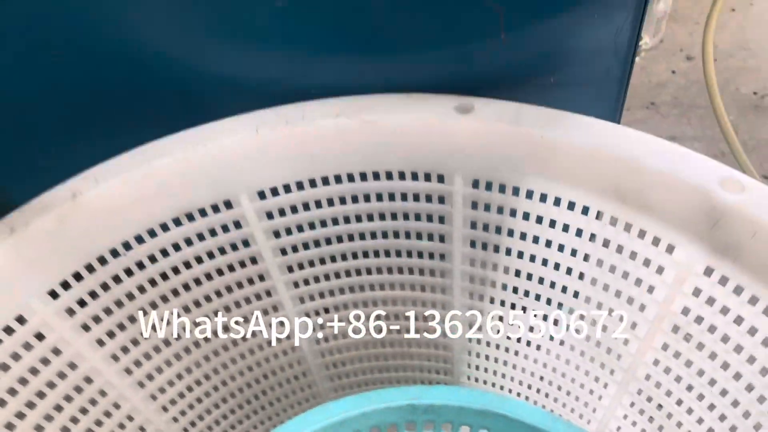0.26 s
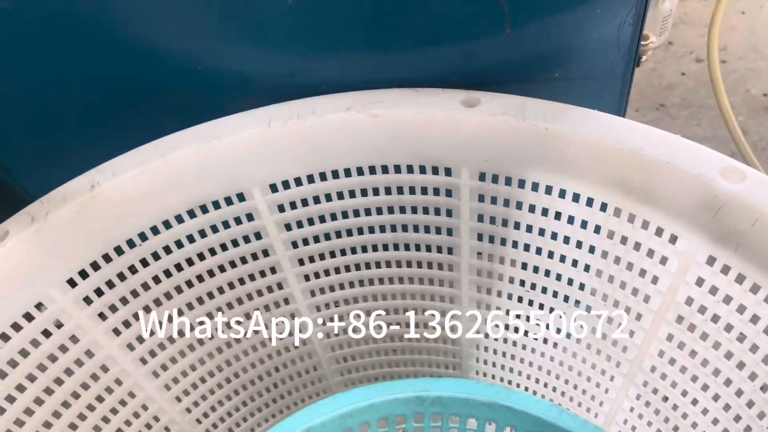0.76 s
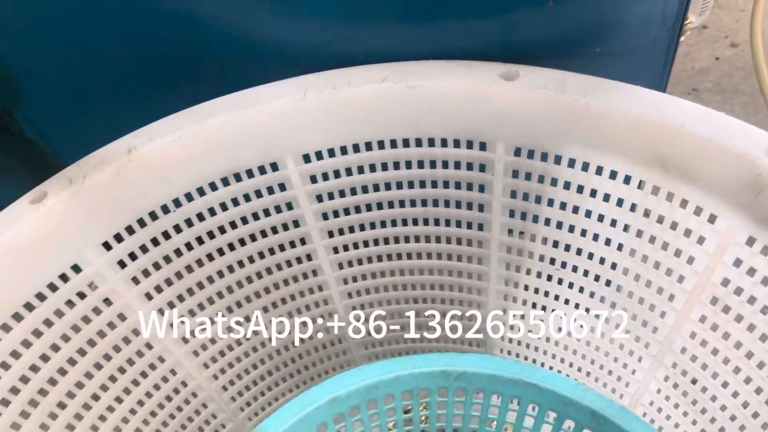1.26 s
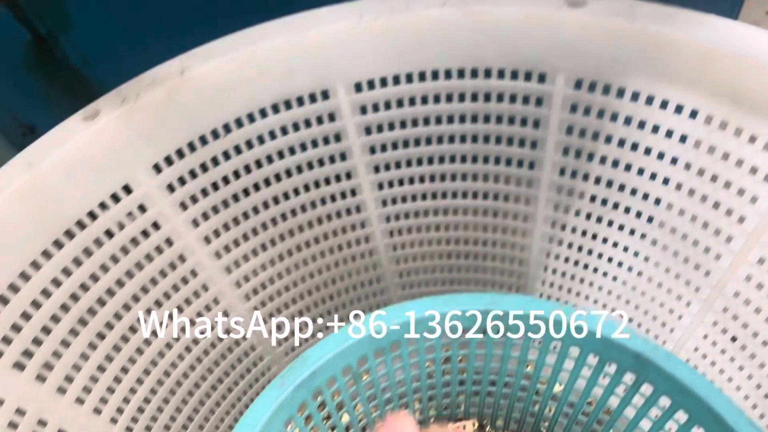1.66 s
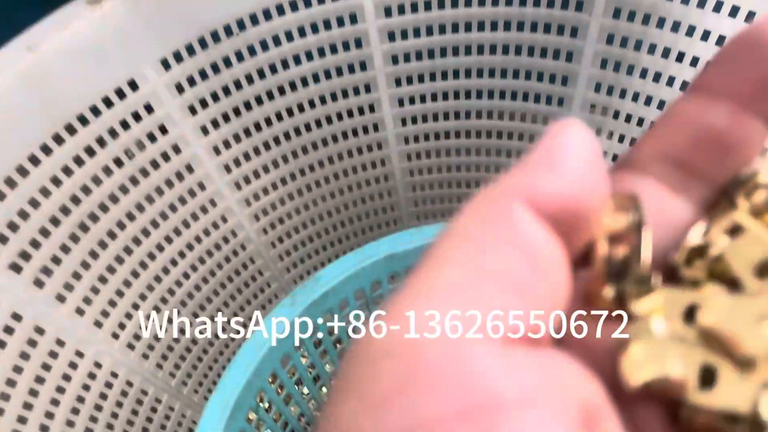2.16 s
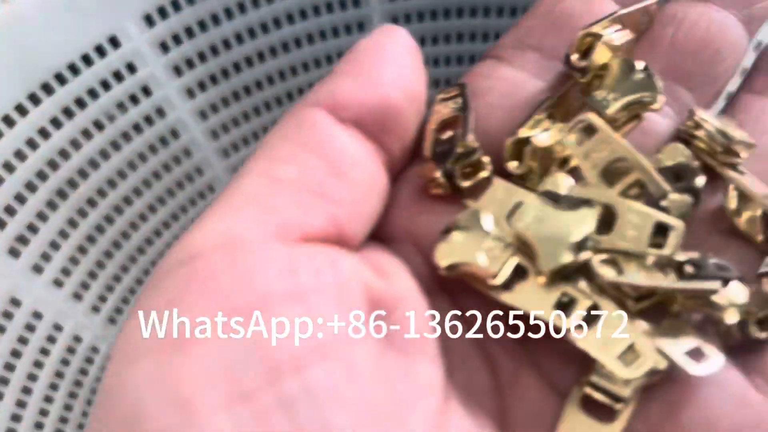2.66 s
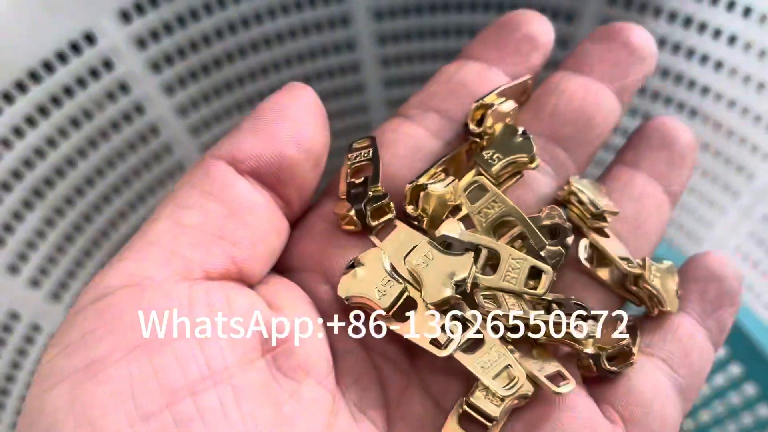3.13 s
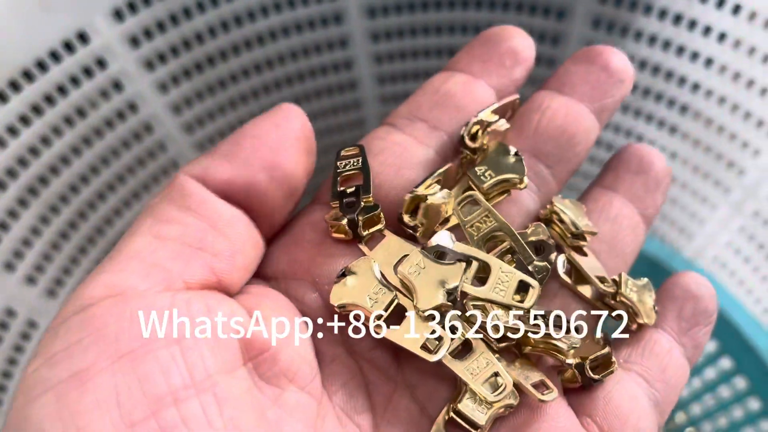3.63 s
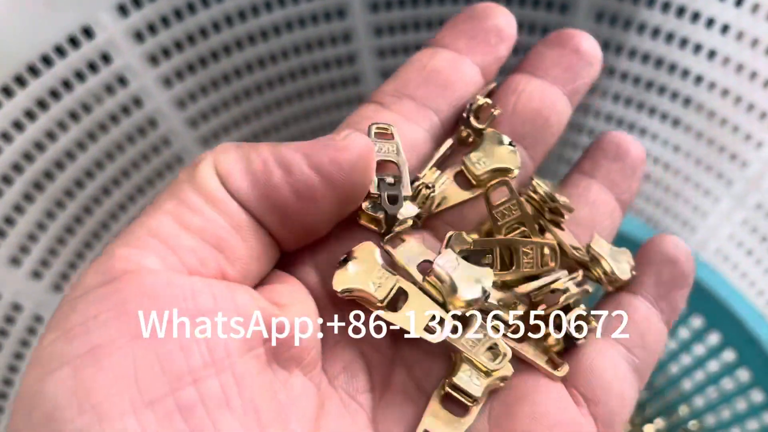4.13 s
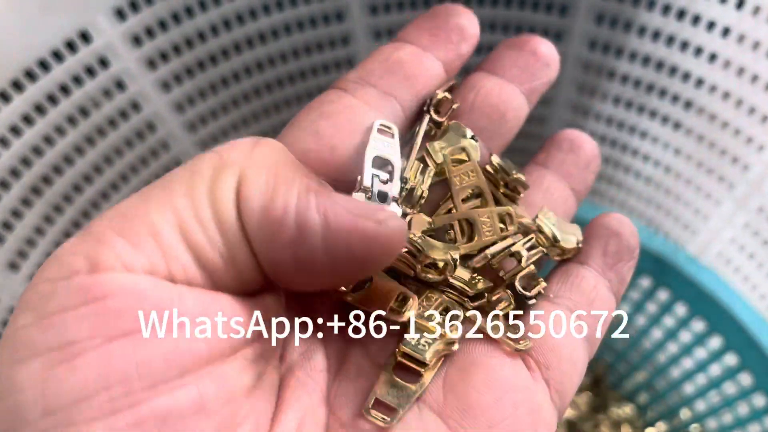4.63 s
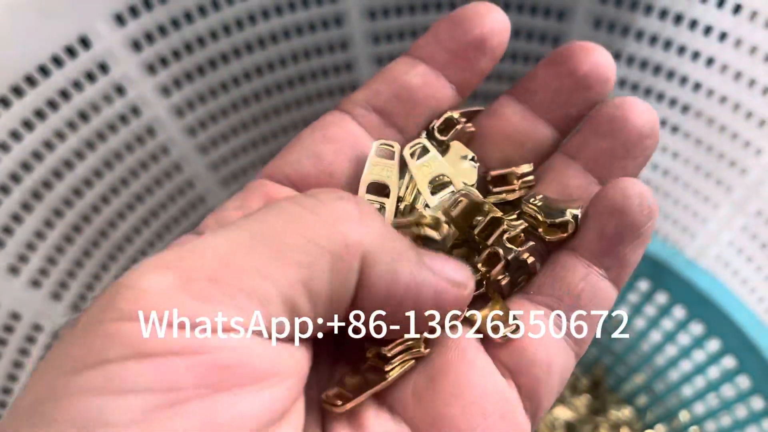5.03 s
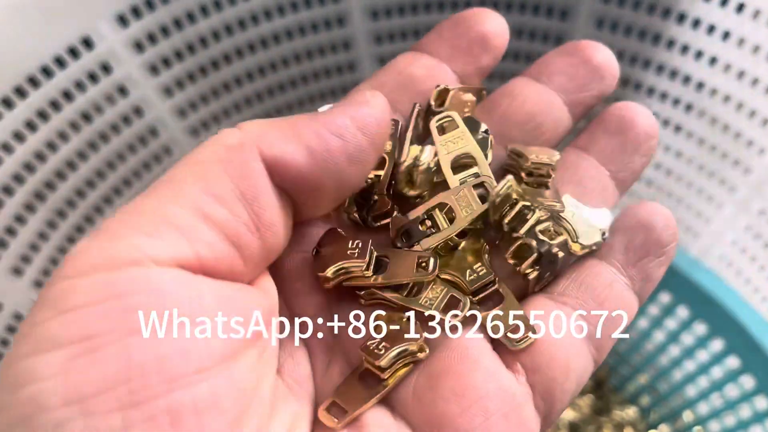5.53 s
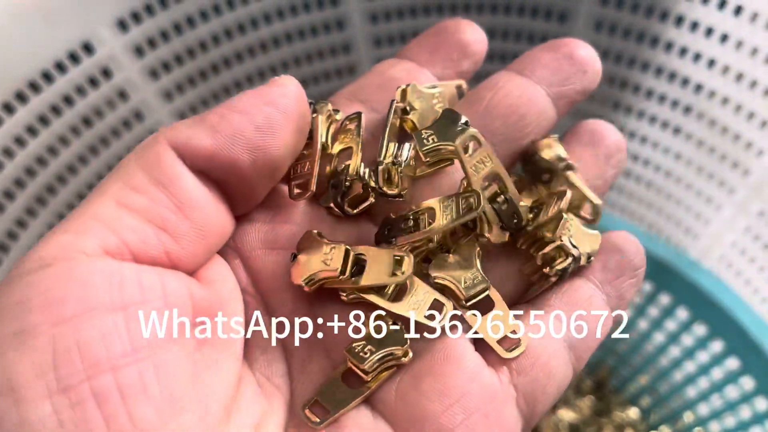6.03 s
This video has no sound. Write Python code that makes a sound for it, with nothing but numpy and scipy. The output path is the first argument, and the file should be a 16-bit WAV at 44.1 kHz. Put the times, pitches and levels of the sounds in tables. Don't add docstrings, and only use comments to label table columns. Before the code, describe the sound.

Close, slightly compressed stereo pickup beside a working machine. Paired dull thuds repeat nearly twice a second, with dry clacking between them and a hard metallic tick late in most turns. Light metal pieces land irregularly, ringing high and short. Later, pieces rub and jingle nearby, busiest near the end. Continuous tiny clicking from a vibrating bowl, low hum and a dull hall wash fill the background.

```python
import sys
import numpy as np
from scipy import signal
from scipy.fft import rfft, irfft, next_fast_len
from scipy.io import wavfile

SR = 44100
rng = np.random.default_rng(int(sys.argv[2]) if len(sys.argv) > 2 else 0)


def volts_from_db(level):
    exponent = np.asarray(level, float) / 20
    return 10 ** exponent


def int16_out(signal):
    q = np.round(np.clip(np.atleast_2d(signal).T, -1, 1) * 32767)
    wavfile.write(sys.argv[1], SR, q.astype(np.int16))


N = 277389


def rms_one(x):
    return x / np.sqrt(np.mean(x ** 2) + 1e-20)


def at_hz(points, hz):
    table_hz, value = np.transpose(points)
    return np.interp(np.log(hz), np.log(table_hz), value)


def drift(rate):
    r = np.exp(-80 * np.pi * rate / SR)
    slow = signal.lfilter([1], [1, -2 * r, r * r], rng.standard_normal(N // 40 + 2002))[2000:]
    return np.interp(np.arange(N) / 40, np.arange(len(slow)), rms_one(slow))


def ring(clicks, hz, t60):
    r, w = volts_from_db(-60 / (t60 * SR)), 2 * np.pi * hz / SR
    return signal.lfilter([0, np.sin(w)], [1, -2 * r * np.cos(w), r * r], clicks + 1e-18)


def blows(times, level_db, chatter, count=1):
    when, size = rng.random((2, len(times), count))
    when[:, 0], size[:, 0] = 0, 1
    chatter_s = np.c_[chatter * np.ones(len(times))]
    at = np.round((np.c_[times] + when * chatter_s) * SR).astype(int)
    size = size * np.c_[volts_from_db(np.asarray(level_db))] * (at < N)
    return np.bincount(np.minimum(at, N - 1).ravel(), size.ravel(), N)


def struck(modes, times, level_db, chatter):
    out = np.zeros(N)
    for hz, db, t60 in modes:
        mode_db = level_db + db + rng.normal(0, 1.7, len(times))
        out += ring(blows(times, mode_db, chatter, count=5), hz, t60)
    return out


def crack(times, level_db, chatter, t60, low_hz, high_hz):
    fade = signal.lfilter([1], [1, -volts_from_db(-60 / (t60 * SR))], blows(times, level_db, chatter, count=3))
    noise = rng.standard_normal(N) * np.sqrt(SR / 8 / (high_hz - low_hz))
    band = signal.butter(2, [low_hz, high_hz], "band", fs=SR, output="sos")
    return signal.sosfilt(band, fade * noise)


FIRST_RAM_S, TURN_S, RETURN_AFTER_S = 0.1338, 0.5402, 0.1532


def rams():
    return np.arange(FIRST_RAM_S, N / SR, TURN_S)


# delay/s, f/Hz, level/dB, t60/s, polarity
RAM_PUSHES = [
    (-.0065, 170, -24, .03, -1),
    (-.004, 560, -22, .02, 1),
    (0, 300, -11.5, .03, -1),
    (.0074, 105, -8.5, .08, 1),
    (.0074, 350, -19, .05, 1),
    (.038, 130, -21, .05, 1),
]
# delay/s, f/Hz, level/dB, t60/s, polarity
RETURN_PUSHES = [
    (-.002, 600, -16, .025, 1),
    (.001, 400, -21, .03, -1),
    (.0062, 130, -12.5, .09, 1),
]
RAM_DB, RETURN_DB, UNEVEN_DB = -1.9, -0.3, 0.84


def thuds():
    ram_s, out = rams(), np.zeros(N)
    strokes = [(ram_s, RAM_DB, RAM_PUSHES), (ram_s + RETURN_AFTER_S, RETURN_DB, RETURN_PUSHES)]
    for stroke_s, strength_db, pushes in strokes:
        stroke_db = strength_db + UNEVEN_DB * rng.standard_normal(len(ram_s))
        for lag, hz, db, t60, sign in pushes:
            out += sign * ring(blows(stroke_s + lag, stroke_db + db, 0), hz, t60)
    return out


# delay after ram/s, f/Hz, width/Hz, level/dB, rise/s
LATCH_CLACKS = [(-.016, 4500, 6000, -33, .012), (-.005, 1200, 1500, -35.5, 0.015),
                (0.046, 2750, 300, -33.5, 0.0072), (.046, 6600, 500, -30, 0.0023),
                (.048, 700, 151, -34.5, .005), (.05, 2970, 5030, -35.5, 0.011),
                (.058, 1880, 356, -33.5, 0.0048), (.06, 2450, 504, -32, 0.0065),
                (.06, 920, 201, -34.5, 0.0082), (0.209, 2610, 304, -31.5, 0.0036),
                (.213, 4060, 5000, -36, 0.0092), (.243, 1950, 610, -32, 0.0057),
                (.243, 1010, 200, -34.5, 0.0047), (.243, 4420, 5000, -33, 0.0043),
                (.258, 464, 150, -32, 0.0061), (.263, 995, 119, -34, 0.0069),
                (0.261, 2970, 2500, -33.5, .008), (.27, 1500, 393, -37.5, 0.0069)]


def clacks():
    t, out = np.arange(SR // 10) / SR, np.zeros(N + SR)
    start = np.c_[rams()]
    for lag, hz, width, db, rise in LATCH_CLACKS:
        swell = t / rise * np.exp(1 - t / rise) * rng.standard_normal((len(start), len(t)))
        r = np.exp(-np.pi * width / SR)
        gain, turn = np.sqrt(1 - r * r), np.cos(2 * np.pi * hz / SR)
        burst = signal.lfilter([gain, 0, -gain], [1, -2 * r * turn, r * r], swell)
        burst = burst * volts_from_db(db + rng.normal(0, 1.2, start.shape))
        at = np.round((start + lag + t) * SR).astype(int)
        out += np.bincount(at.ravel(), burst.ravel(), N + SR)
    return out[:N]


# t/s, peak level/dB, bright level/dB
EJECTOR_TICKS = [
    (0.467, -17.5, -29),
    (1.0034, -19, -37),
    (1.5444, -30, -46),
    (2.086, -21.5, -35),
    (2.6307, -28, -34),
    (3.1668, -15.5, -34),
    (3.7197, -17.5, -31),
    (4.2494, -27, -40),
    (4.7963, -19, -40),
    (5.3294, -27, -49),
]
# f/Hz, level/dB, t60/s
EJECTOR_MODES = [(4050, -4, .025), (4400, -6, .02), (4790, -2, .028), (6250, -6, .02)]


def ejector():
    s, db, bright_db = np.transpose(EJECTOR_TICKS)
    tick = struck(EJECTOR_MODES, s, db - 6.5, 0.002007)
    snap = crack(s, db - 10.5, 0.0029, t60=0.047, low_hz=3800, high_hz=5250)
    return tick + snap + crack(s, bright_db + 5.5, 0.0066, t60=0.061, low_hz=8720, high_hz=13690)


# f/Hz, level/dB, t60/s
BODY_MODES = [(2790, -3, .07), (2832, -2, .11), (2930, -4, .05), (3010, -3, .06), (3074, -4, .09),
              (3143, -3, .11), (3260, -6, .05)]
EDGE_MODES = [(6910, -13, 0.12), (6960, 2, 0.15), (7390, -20, 0.051)]
JINGLE_MODES = [(7700, -1, .05), (8100, 0, .06), (8600, 0, .07), (9120, -3, .06), (9450, -4, .04)]
BRIGHT_MODES = [(9810, 6.5, .06), (10270, 1.5, .04), (11300, 1.5, .06), (12000, 3, 0.054),
                (12100, -17, 0.026)]
BRIGHT_DB = -9


def parts(s, body_db, scrape_db, edge_db, jingle_db):
    bright_db = jingle_db + BRIGHT_DB
    out = struck(BODY_MODES, s, body_db - 5.0, 0.0046)
    out += struck(EDGE_MODES, s, edge_db - 4.5, .005)
    out += struck(JINGLE_MODES, s, jingle_db - 8, .006)
    out += struck(BRIGHT_MODES, s, bright_db - 8.0, 0.0063)
    out += crack(s, scrape_db - 2.5, .005, t60=0.068, low_hz=3270, high_hz=6700)
    out += crack(s, jingle_db - 2, .006, t60=.075, low_hz=7200, high_hz=9700)
    return out + crack(s, bright_db + 0.5, 0.0058, t60=0.039, low_hz=9900, high_hz=14100)


# t/s, body level/dB, treble level/dB
CHUTE_DROPS = [(0.0252, -26, -13.5), (0.0725, -34, -31), (0.11, -40, -28), (0.582, -28, -23),
               (0.6127, -27.5, -27), (0.628, -26, -21), (0.672, -33, -30), (1.111, -20, -17),
               (1.165, -29, -34), (1.6161, -23, -6), (1.681, -22, -27), (1.761, -29, -21.5),
               (1.7744, -31, -27), (1.799, -46, -25), (2.2624, -18.5, -19.5), (2.421, -31, -29),
               (2.865, -20, -17), (2.891, -41, -24), (3.258, -24.5, -20.5), (3.29, -24, -33),
               (3.325, -26.5, -31), (4.357, -25.5, -19.5), (5.422, -38, -18.5), (5.454, -24.5, -21.5),
               (5.4935, -27, -18.5), (5.527, -30, -29), (5.6495, -24, -24), (6.073, -23, -15.5),
               (6.0813, -21, -21)]
EDGE_DB, SCRAPE_DB = -9, -10


def drops():
    s, body_db, treble_db = np.transpose(CHUTE_DROPS)
    scrape_db = (body_db + treble_db) / 2 + SCRAPE_DB
    return parts(s, body_db, scrape_db, treble_db + EDGE_DB, treble_db)


# t/s, level/dB, favoured f/Hz, loss/dB per octave away
PLATE_TOUCHES = [
    (0.0245, -28, 5930, 45),
    (0.6125, -34, 5800, 18),
    (1.1102, -28.5, 4540, 22),
    (1.6157, -27, 5500, 9),
    (1.76, -39, 5120, 70),
    (2.8649, -36, 5500, 25),
    (4.356, -40, 4660, 12),
    (5.4929, -38, 5900, 35),
    (6.0805, -29.5, 5400, 45),
]
# f/Hz, level/dB, t60/s
PLATE_MODES = [(3585, 0, .2), (4276, -1, .18), (5120, 1, .5), (5496, 0, .3), (6896, 0, .13)]


def plate():
    s, db, near_hz, loss_db = np.transpose(PLATE_TOUCHES)
    out = np.zeros(N)
    for hz, mode_db, t60 in PLATE_MODES:
        touch_db = db + mode_db + 4.5 - loss_db * np.abs(np.log2(hz / near_hz))
        out += ring(blows(s + .003, touch_db, 0), hz, t60)
    return out


# t/s, scrape level/dB, treble level/dB
PART_JOSTLES = [
    (2.2987, -35, -36),
    (2.706, -22, -36),
    (3.799, -28, -24),
    (4.32, -26, -26),
    (4.982, -39, -26),
    (5.102, -46, -31),
    (5.8427, -26, -29),
    (5.872, -25, -22.5),
    (5.923, -28, -31),
    (6.1245, -28, -26),
]
JOSTLE_BODY_DB, JOSTLE_EDGE_DB = -12, -20


def jostles():
    s, scrape_db, treble_db = np.transpose(PART_JOSTLES)
    return parts(s, scrape_db + JOSTLE_BODY_DB, scrape_db, treble_db + JOSTLE_EDGE_DB, treble_db)


RATTLE_PER_S, RATTLE_DB = 1500, -40


def bowl_rattle():
    sizes = volts_from_db(5.36 * np.minimum(rng.exponential(1, N), 5)) * rng.choice([-1, 1], N)
    born = rng.random(N) < RATTLE_PER_S * volts_from_db(3.0 * drift(8)) / SR
    pitches, dealt = np.geomspace(1500, 12000, 10), rng.integers(0, 10, N)
    hops = sum(ring(sizes * born * (dealt == k), hz, 11.8 / hz) for k, hz in enumerate(pitches))
    return volts_from_db(RATTLE_DB) * rms_one(hops)


# f/Hz, width/Hz, level/dB
MOTOR_TONES = [(94.6, 21, -40), (299.7, 5.8, -43), (365, 12, -44), (444.9, 8.6, -42), (973, 14.4, -48.5)]


def motors():
    white, out = rng.standard_normal(N), np.zeros(N)
    for hz, width, db in MOTOR_TONES:
        t60 = 1.64 / width
        out += volts_from_db(db) * rms_one(ring(ring(white, hz, t60), hz, t60))
    return out


ECHO_DB, ECHO_T60_S = -7.5, 0.34


def echoes(x):
    t = np.arange(SR // 2) / SR
    wash = rng.standard_normal((2, len(t))) * volts_from_db(-60 * t / ECHO_T60_S) * np.minimum(t / 0.0036, 1)
    wash = signal.sosfilt(signal.butter(4, 5500, fs=SR, output="sos"), wash)
    wash = wash / np.sqrt(np.sum(wash[0] ** 2))
    return volts_from_db(ECHO_DB) * signal.fftconvolve(x[None], wash, axes=1)[:, :N]


# t/s, level/dB
FLOOR_LEVEL = [(0.0, -28.5), (1.5, -28), (1.75, -29), (4.802, -28.5), (5.12, -27), (5.45, -28.5),
               (6.29, -27.5)]
# f/Hz, density/dB per Hz
HALL_COLOUR = [(28, -27), (45, -4.5), (105, 0.5), (225, -8.5), (430, -9), (700, -13.5), (1500, -15.5),
               (2800, -16), (4500, -19.5), (6500, -15), (8500, -21.5), (10500, -20), (13000, -24.5),
               (15500, -27.5)]
# f/Hz, likeness/0-1
PORT_LIKENESS = [(60, 1), (300, 0.8), (700, 0.38), (1800, 0.04), (3500, 0.47), (5500, 0.45), (7000, 0.15)]


def factory_floor(patchy_db):
    out, together, edges = 0, drift(5.0), 33 * 2 ** np.arange(0, 9.1, .5)
    white = rng.standard_normal((2, 2, N))
    for k, (low, high) in enumerate(zip(edges, edges[1:])):
        band = signal.butter(2, [low, high], "band", fs=SR, output="sos")
        mid, side = signal.sosfilt(band, white[k % 2])
        hz = np.sqrt(low * high)
        alike = np.clip(at_hz(PORT_LIKENESS, hz), -1, 1)
        gain = volts_from_db(at_hz(HALL_COLOUR, hz) + patchy_db * (0.35 * together + drift(12.6)))
        out = out + gain * (np.sqrt(1 + alike) * mid + np.sqrt(1 - alike) * side * [[1], [-1]])
    s, db = np.transpose(FLOOR_LEVEL)
    return volts_from_db(np.interp(np.arange(N) / SR, s, db) + 2.5) * rms_one(out)


ALIKE_ABOVE_HZ = 7400


def alike_treble(x):
    size = next_fast_len(N + 4096)
    hz = np.arange(size // 2 + 1) * SR / size
    side = rfft(x[0] - x[1], size) / 2 / (1 + (hz / ALIKE_ABOVE_HZ) ** 30)
    return x.mean(0) + irfft(side, size)[:N] * [[1], [-1]]


PARTS_LEAD_S = 3e-6


def scene():
    machine = clacks() + ejector() + bowl_rattle()
    close = drops() + jostles()
    far = echoes(machine + close) + factory_floor(patchy_db=2.0)
    n = np.arange(N)
    close = [np.interp(n + lead * SR, n, close) for lead in (PARTS_LEAD_S, -PARTS_LEAD_S)]
    return thuds() + machine + close + plate() + motors() + alike_treble(far)


def roll_off(x):
    return signal.sosfilt(signal.butter(12, 15720, fs=SR, output="sos"), x)


# f/Hz, left minus right level/dB
PORT_BALANCE = [(60, 1.2), (600, 1.8), (1400, 0), (3000, 2), (5000, 1.5), (7500, 0)]
# f/Hz, lag/half cycles
PORT_PHASE = [(0, 0), (6000, .1), (7300, .5), (7800, .94), (8800, .94), (9500, 1.35), (10100, 1.9),
              (10500, 2), (13300, 2), (13900, 2.94), (22050, 2.94)]
LIMIT_DB, RECOVER_DB_PER_S, SQUEEZE = -4.5, 23.5, 0.73


def record(dry):
    size = next_fast_len(N + 4096)
    hz = np.maximum(np.arange(size // 2 + 1) * SR / size, 1)
    lag = np.interp(hz, *np.transpose(PORT_PHASE))
    turn = volts_from_db(at_hz(PORT_BALANCE, hz) / 2) * np.exp(-.5j * np.pi * lag)
    left, right = rfft(dry, size) / (1 + (35.3 / hz) ** 6)
    x = irfft([left * turn, right / turn], size)[:, :N]
    ramp = RECOVER_DB_PER_S * np.arange(N) / SR
    over = np.maximum(20 * np.log10(np.abs(x).max(0) + 1e-9) - LIMIT_DB, 0)
    held = np.maximum.accumulate(over + ramp) - ramp
    x = x * volts_from_db(-SQUEEZE * signal.lfilter([.002], [1, -.998], held))
    x = .85 * np.tanh(x / .85)
    return roll_off(x)


dry = scene()
out = record(dry)
int16_out(out)
```